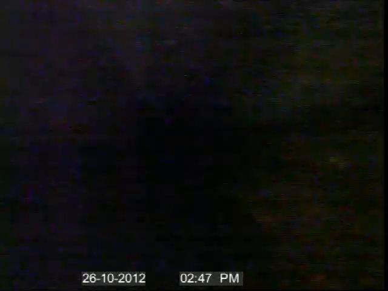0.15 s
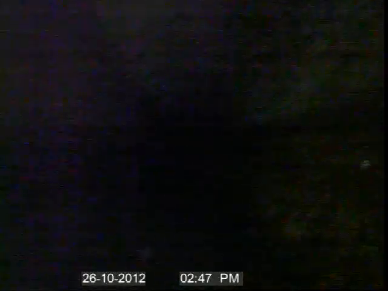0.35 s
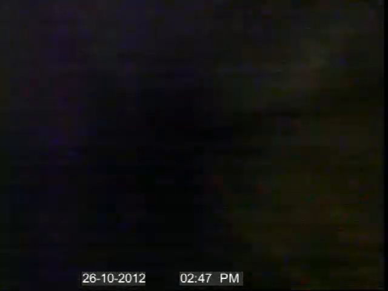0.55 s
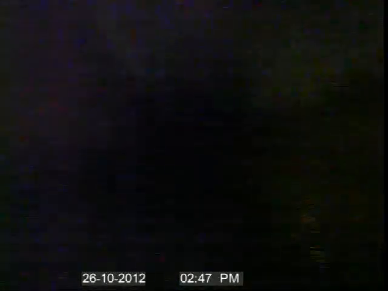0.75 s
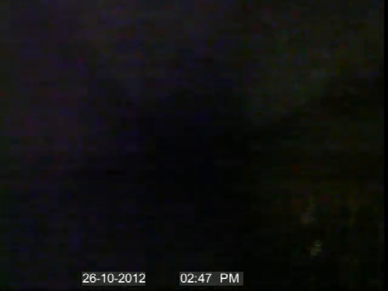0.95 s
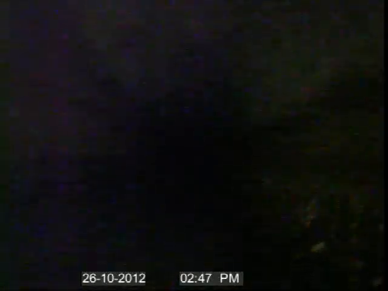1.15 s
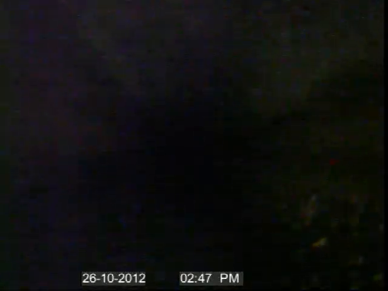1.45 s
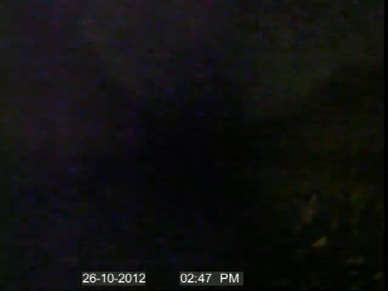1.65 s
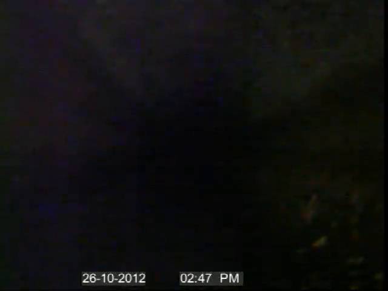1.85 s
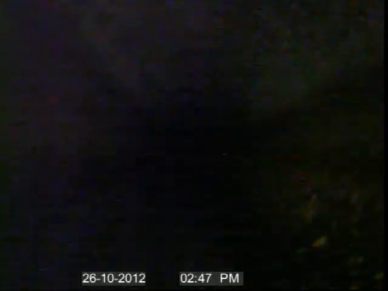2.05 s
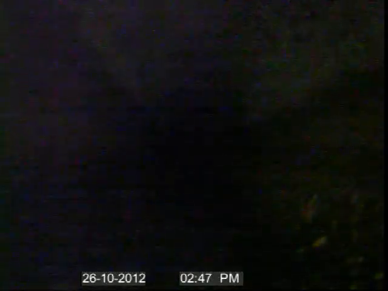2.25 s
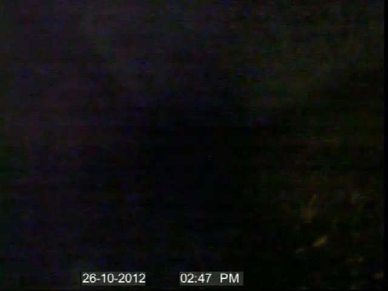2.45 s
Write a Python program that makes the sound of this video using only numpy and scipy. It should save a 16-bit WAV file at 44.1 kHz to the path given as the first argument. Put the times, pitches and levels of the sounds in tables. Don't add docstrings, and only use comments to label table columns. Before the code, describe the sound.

A camera head on a push cable drags through a drain pipe with loud, overloaded boomy rumble and gritty scraping, slows to a faint hum, then loose knocks, a heavy thump and two ringing metal clicks, miked very close.

```python
import sys
import numpy as np
from scipy import signal
from scipy.fft import rfft, irfft
from scipy.io import wavfile
from scipy.ndimage import uniform_filter1d

SR = 44100
rng = np.random.default_rng(int(sys.argv[2]) if len(sys.argv) > 2 else 0)


def wav_record(signal):
    frames = np.transpose(np.atleast_2d(signal))
    bounded = np.clip(frames, -1, 1)
    quanta = np.round(bounded * 32767).astype(np.int16)
    wavfile.write(sys.argv[1], SR, quanta)


def level_to_linear(level):
    exponent = np.asarray(level, float) / 20
    return 10 ** exponent


N = 114660


def evened(x):
    return x / np.sqrt(np.mean(x ** 2) + 1e-20)


def read(points, hz):
    f, value = np.transpose(points)
    return np.interp(np.log(hz + 1), np.log(f + 1), value)


def add(mix, start_s, sound):
    part = mix[round(start_s * SR):][:len(sound)]
    part += sound[:len(part)]


def butter(x, order, hz, kind="low"):
    return signal.sosfilt(signal.butter(order, hz, kind, fs=SR, output="sos"), x)


def resonate(x, hz, width_hz):
    r = np.exp(-np.pi * width_hz / SR)
    return evened(signal.lfilter([1, 0, -r], [1, -2 * r * np.cos(2 * np.pi * hz / SR), r * r], x))


def slips(per_s, spread_db):
    size = level_to_linear(spread_db * np.minimum(rng.exponential(1, N), 4))
    return size * rng.choice([-1., 1.], N) * (rng.random(N) < per_s / SR)


def wander(per_s):
    return evened(butter(rng.standard_normal(N), 2, per_s))


def drag():
    # time_s, effort_db
    push = [
        (0.0, -13),
        (0.124, -15.5),
        (0.242, -14.5),
        (0.492, -15.5),
        (0.528, -23),
        (0.566, -18.5),
        (0.788, -25.5),
        (1.062, -54),
        (1.15, -74),
    ]
    # pitch_hz, width_hz, level_db
    pipe = [(44.7, 17, -11), (73, 29, 0), (123.4, 70, -6.5), (154, 45, -17), (208, 26.7, -5.5),
            (258.4, 8.8, -2), (299, 48, -14.5), (365.2, 32.4, -3.5), (396.5, 19.8, -7), (750, 780, -15)]
    # time_s, level_db
    grit_load = [(0, -3.5), (.1, -1.5), (.22, 2), (.42, 1.5), (.6, -5.5), (.8, -14), (1.05, -35),
                 (1.2, -70)]
    # pitch_hz, width_hz, level_db
    grit_bands = [(880, 490, 2.5), (1530, 280, -1.5), (2170, 890, -6.5), (2916, 280, -2.5),
                  (3470, 500, -13), (3977, 180, 0.5), (4540, 260, -6), (7000, 5300, -10.5)]
    gusts_per_s, strand_s, strand_db = 25, .06, 1.5
    squeeze, squeeze_s = .5, .03
    grit_db = -46

    t = np.arange(N) / SR
    effort_db = np.interp(t, *np.transpose(push)) - 600 * np.clip(t - push[-1][0], 0, 1)
    gust_db = 1.5 * wander(gusts_per_s)
    jolts = slips(1500, 2.5) * level_to_linear(gust_db)
    strand = evened(uniform_filter1d(gust_db, size=round(strand_s * SR), mode="wrap"))
    boom = 0
    for k, (hz, width_hz, db) in enumerate(pipe):
        mode = resonate(resonate(jolts, hz, width_hz), hz, 3 * width_hz + 60)
        boom = boom + level_to_linear(db + strand_db * np.roll(strand, k * N // len(pipe))) * mode
    boom = butter(boom, 5, 470) + 0.18 * boom
    surge = uniform_filter1d(evened(boom) ** 2, size=round(squeeze_s * SR))
    boom = boom / (surge + 0.087) ** (squeeze / 2)

    sand = slips(2500, 4.0) * level_to_linear(1.2 * wander(gusts_per_s))
    hiss = 0
    for hz, width_hz, db in grit_bands:
        hiss = hiss + level_to_linear(db) * resonate(resonate(sand, hz, width_hz), hz, 2 * width_hz)
    load_db = np.interp(t, *np.transpose(grit_load))
    return level_to_linear(effort_db + 0.5) * evened(boom) + level_to_linear(grit_db + load_db) * evened(hiss)


def floor():
    # pitch_hz, density_db (per Hz)
    air_curve = [(15, -12), (40, 2), (100, -5.5), (190, -19), (450, -24), (870, -33.5), (2500, -38.5),
                 (11500, -42.5)]
    # multiple, level_db
    whine_partials = [(1, -76), (2, -73), (3, -76), (4, -78), (5, -79), (9, -78)]
    # pitch_hz, width_hz, level_db
    drone_band = (312, 6, -55)
    # time_s, level_db
    drone_swell = [(0, -0.5), (.9, 4.5), (1.25, -0.5), (1.35, -8), (1.95, -8), (2.08, 3), (2.6, 1.5)]
    air_db, swell_db, low_patch_db, hiss_patch_db = -38.5, .4, 3, .5
    whine_hz = 1024

    t = np.arange(N) / SR
    frames, hz = N // 256 + 5, np.fft.rfftfreq(1024, 1 / SR)
    real, imag, patches = rng.standard_normal((frames, 513, 3)).T
    patches = uniform_filter1d(patches, size=8, axis=0)
    patches = evened(uniform_filter1d(patches, size=10, axis=1))
    patch_db = np.where(hz < 800, low_patch_db, hiss_patch_db)[:, None] * patches
    z = (real + 1j * imag) * level_to_linear(read(air_curve, hz)[:, None] + patch_db)
    air = evened(signal.istft(z, nperseg=1024, noverlap=768)[1][:N])
    air = air * level_to_linear(air_db + swell_db * wander(19))

    whine = sum(level_to_linear(db + 1.5 * wander(15)) * np.sin(2 * np.pi * k * whine_hz * t) for k, db in whine_partials)
    drone_hz, width_hz, drone_db = drone_band
    drone = resonate(rng.standard_normal(N), drone_hz, width_hz)
    return air + whine + level_to_linear(drone_db + np.interp(t, *np.transpose(drone_swell))) * drone


def scuffs():
    # start_s, level_db, length_s, top_hz
    first_scuff = (.024, -27, .011, 1500)
    # start_s, level_db, length_s, top_hz
    scrapes = [(0.128, -39.5, 0.0086, 1380), (.3, -36.5, 0.036, 1150), (.51, -37, 0.024, 940),
               (.587, -50, 0.0088, 1160), (1.487, -49, 0.014, 1090), (1.52, -47.5, 0.013, 1060),
               (1.651, -41, 0.03, 525), (1.736, -50.5, 0.021, 556), (1.8146, -40, 0.0036, 3960),
               (2.019, -36, 0.073, 361)]
    out, t = np.zeros(N), np.arange(SR // 3) / SR
    for start_s, db, length_s, top_hz in [first_scuff] + scrapes:
        band = evened(butter(rng.standard_normal(len(t)), 6, [top_hz / 4, top_hz], "band"))
        fade_db = -60 * np.maximum(t - length_s, 0) / 0.0099
        add(out, start_s, level_to_linear(db + fade_db) * np.minimum(t / 0.00038, 1) * band)
    return out


def knocks():
    # start_s, peak_db, pitch_hz, t60_s, rise_s
    bumps = [(.0245, -22, 797, 0.057, 0.00045), (.03, -26, 638, 0.07, 0.00077),
             (1.322, -40.5, 258, 0.057, 0.0011), (1.49, -36.5, 274, 0.028, 0.00087),
             (1.499, -32, 420, 0.08, 0.0028), (1.524, -20.5, 318, 0.013, .001),
             (1.6, -44, 353, 0.058, 0.0011), (1.655, -43, 380, 0.042, .002),
             (1.663, -33.5, 300, 0.05, .004), (1.742, -43, 200, 0.024, .001),
             (1.8156, -25.5, 300, .012, 0.0004), (1.834, -26.5, 308, 0.039, 0.0012),
             (1.853, -21, 285, 0.052, 0.007), (2.3925, -29, 520, .04, .0005)]
    out, t = np.zeros(N), np.arange(SR // 4) / SR
    for start_s, db, hz, t60_s, rise_s in bumps:
        ring = np.sin(2 * np.pi * hz * t) * np.minimum(t / rise_s, 1)
        add(out, start_s, -level_to_linear(db + 3 - 60 * t / t60_s) * ring)
    return out


def ticks():
    # pitch_hz, width_hz, level_db
    housing = [(870, 730, 1), (1570, 170, -5), (2200, 710, -12), (2870, 220, -0.5), (3980, 170, 2),
               (4580, 260, -2), (7100, 4800, -29)]
    # start_s, level_db, t60_s, bright_db (per octave about 2 kHz)
    snaps = [(0.0984, -38.5, 0.036, 11), (0.182, -41, .03, -13), (0.1951, -40, 0.14, 7),
             (1.341, -49, 0.081, -12), (1.426, -44.5, 0.056, -0.5), (1.508, -43.5, 0.05, -12),
             (1.66, -50, 0.2, -9), (1.816, -32, 0.048, -26), (1.834, -40, 0.085, -8),
             (1.845, -46, 0.046, -7), (1.938, -47.5, 0.039, -6), (2.211, -46, 0.037, -14),
             (2.541, -42, 0.033, -5)]
    out, t = np.zeros(N), np.arange(SR // 8) / SR
    for start_s, db, t60_s, bright_db in snaps:
        burst = rng.standard_normal(len(t))
        bands = 0
        for hz, width_hz, band_db in housing:
            tilt_db = bright_db * np.log2(hz / 2000)
            bands = bands + level_to_linear(band_db + tilt_db) * resonate(burst, hz, width_hz)
        add(out, start_s, evened(bands) * level_to_linear(db - 60 * t / t60_s) * np.minimum(t / .0007, 1))
    return out


def creep():
    # start_s, length_s, pitch_hz, width_hz, level_db
    squeaks = [(0.44, 0.538, 723, 207, -48.5), (.2, 0.124, 207.7, 37.6, -18.5),
               (2.398, .011, 1960, 170, -31), (1.4, 0.36, 450, 77, -60), (2.2, 0.145, 370, 115, -55.5),
               (1.6, 0.153, 430, 95, -55), (0.85, 0.785, 1630, 87, -62), (1.62, 0.195, 1620, 110, -59),
               (1.7, 0.057, 6500, 3100, -62.5)]
    # start_s, length_s, from_hz, to_hz, level_db
    hums = [
        (.93, 0.361, 116, 127.5, -37),
        (1.6, 0.307, 100.5, 118, -40.5),
    ]
    out = np.zeros(N)
    for start_s, length_s, hz, width_hz, db in squeaks:
        n = round(length_s * SR)
        tone = resonate(resonate(slips(1500, 4.4)[:n], hz, width_hz), hz, 2 * width_hz)
        add(out, start_s, level_to_linear(db) * tone * signal.windows.tukey(n, .4))
    for start_s, length_s, from_hz, to_hz, db in hums:
        n = round(length_s * SR)
        turns = np.cumsum(np.linspace(from_hz, to_hz, n) * (1 + 0.013 * wander(19)[:n])) / SR
        tone = np.sin(2 * np.pi * turns) * signal.windows.tukey(n, .3)
        add(out, start_s, level_to_linear(db + 0.52 * wander(9.7)[:n]) * tone)
    return out


def sways():
    # start_s, level_db, pitch_hz, t60_s
    lumps = [(2.02, -12, 109, 0.044), (0.599, -13.5, 57.5, 0.34), (0.829, -23, 52, 0.29),
             (1.525, -22.5, 51.7, 0.079), (1.69, -46, 55, 0.15), (1.923, -20, 41.3, 0.11),
             (2.035, -25.5, 67, 0.44), (2.391, -21.5, 67.5, 0.12)]
    out, t = np.zeros(N), np.arange(SR // 3) / SR
    for start_s, db, hz, t60_s in lumps:
        add(out, start_s, level_to_linear(db - 60 * t / t60_s) * np.sin(2 * np.pi * hz * t) * np.minimum(t / 0.0061, 1))
    return out


def swishes():
    # start_s, length_s, pitch_hz, level_db
    slides = [(1.7, 0.013, 9900, -57.5), (0.95, 0.069, 9200, -59), (2.206, 0.016, 9100, -55),
              (0.79, 0.022, 11400, -60.5), (1.643, 0.04, 2700, -57.5), (2.471, 0.11, 2900, -60.5),
              (3, 0.011, 3100, -51), (1.6, .025, 2300, -59)]
    out = np.zeros(N)
    for start_s, length_s, hz, db in slides:
        n = round(length_s * SR)
        add(out, start_s, level_to_linear(db) * resonate(rng.standard_normal(n), hz, 0.14 * hz) * signal.windows.tukey(n, .5))
    return out


def thump():
    # start_s, level_db, pitch_hz, t60_s
    heavy = (2.0135, -13, 72, .12)
    snap_hz, snap_db, snap_t60_s = 250, -11.5, 0.022
    out, t = np.zeros(N), np.arange(SR // 4) / SR
    start_s, db, hz, t60_s = heavy
    body = level_to_linear(db - 60 * t / t60_s) * np.sin(2 * np.pi * hz * t) * np.minimum(t / 0.0035, 1)
    snap = level_to_linear(snap_db - 60 * t / snap_t60_s) * np.sin(2 * np.pi * snap_hz * t) * np.minimum(t / 0.0014, 1)
    add(out, start_s, body - snap)
    return out


def clicks():
    strikes_s = [2.0625, 2.3925]
    # level_db, rise_s, bright_db (above 8.5 kHz), body_db (below 1.4 kHz)
    strikes = [
        (-22.5, 0.0029, 14, 2),
        (-15, 0.00029, 4.5, -2.5),
    ]
    # pitch_hz, density_db (per Hz)
    crack_curve = [(59, -23), (100, -21), (329, -5.5), (2020, -3.5), (2570, -15.5), (5310, -6),
                   (9730, -15.5), (12400, -17), (16100, -66), (22000, -120)]
    metal_hz = [980, 1149, 1520, 1720, 1986, 2783, 3860, 2897, 5114, 5233, 6526, 6850, 8990, 9497]
    # level_db, t60_s
    metal = [(-16, .24), (-5.5, .16), (-5, .07), (-14, .16), (-2, .045), (-14, .15), (-7, .075), (-16, .14),
             (-2, .115), (0, .1), (-7, .095), (-7, .085), (-13, .06), (-17, .12),
             (-19, .18), (-16, .11), (-10, .09), (-11, .075), (-17, .09), (-13, .06), (-22, .06),
             (-4, .075), (-7, .06), (-7, .07), (-17, .06), (-7, .05), (-9, .045), (-15, .05)]
    more_metal_hz = [2304, 3531, 5545, 7688, 8129, 9701, 10840, 1859, 5350, 6435, 1320, 6320, 1070, 7030]
    crack_t60_s, tail_db, tail_t60_s = .042, -9, .13
    strike_lag_s = .003

    out, t = np.zeros(N), np.arange(SR // 3) / SR
    noise_hz = np.fft.rfftfreq(len(t), 1 / SR)
    for start_s, (db, rise_s, bright_db, body_db) in zip(strikes_s, strikes):
        colour = level_to_linear(read(crack_curve, noise_hz) + bright_db * (noise_hz > 8500))
        noise = evened(irfft(rfft(rng.standard_normal(len(t))) * colour, len(t)))
        crack = noise * (level_to_linear(-60 * t / crack_t60_s) + level_to_linear(tail_db - 60 * t / tail_t60_s))
        ring = 0
        for k, (hz, (mode_db, t60_s)) in enumerate(zip(metal_hz + more_metal_hz, metal)):
            mode_db = mode_db + bright_db * (hz > 8500) + body_db * (hz < 1400)
            mode = (-1) ** k * np.sin(2 * np.pi * hz * (t - strike_lag_s))
            ring = ring + level_to_linear(mode_db - 60 * t / t60_s) * mode
        add(out, start_s, level_to_linear(db) * np.minimum(t / rise_s, 1) * (crack + ring))
    return out


def scene():
    head = drag() + scuffs() + knocks() + ticks() + sways() + thump()
    return (head + floor() + creep() + swishes() + clicks())[None]


def band_limit(x):
    return signal.sosfilt(signal.butter(12, 12540, fs=SR, output="sos"), x)


def record(dry):
    # low_hz, high_hz, level_db
    smear_bands = [(500, 9600, 0), (7200, 12900, -4)]
    ceiling, knee = .268, 6
    smear_s, smear_lag_s, smear_db = .125, .013, -11
    rise_db, fade_db = -4, -20.5
    edge_hz = 11320

    x = dry[0] / (1 + abs(dry[0] / ceiling) ** (2 * knee)) ** (.5 / knee)
    window = signal.windows.tukey(round(smear_s * SR), .3)
    corners_s = [0, smear_s / 2 - smear_lag_s, smear_s]
    slope_db = np.interp(np.linspace(0, smear_s, len(window)), corners_s, [rise_db, 0, fade_db])
    window = window * level_to_linear(2 * slope_db)
    fuzz, smear = rng.standard_normal(N), 0
    for low_hz, high_hz, db in smear_bands:
        treble = butter(x, 4, [max(low_hz, 1500), high_hz], "band")
        level = np.sqrt(abs(signal.oaconvolve(treble ** 2, window / window.sum(), "same")))
        band = evened(butter(fuzz, 2, [low_hz, high_hz], "band"))
        smear = smear + level_to_linear(smear_db + db) * np.roll(level, round(smear_lag_s * SR)) * band
    x = signal.sosfiltfilt(signal.butter(10, edge_hz, fs=SR, output="sos"), x + smear)
    return band_limit(x[None])


dry = scene()
out = record(dry)
wav_record(out)
```